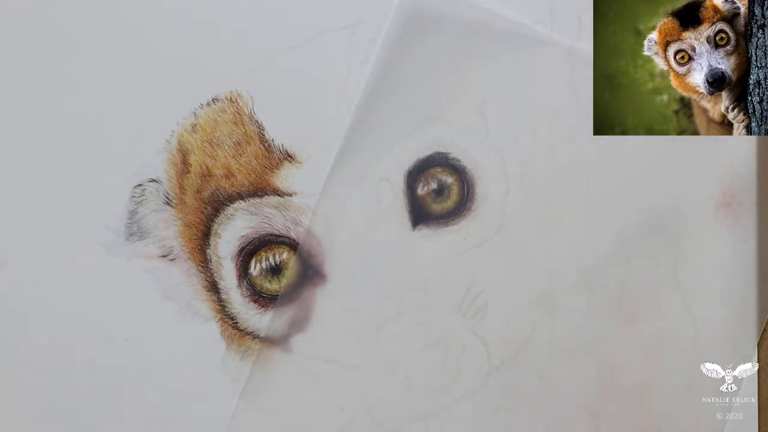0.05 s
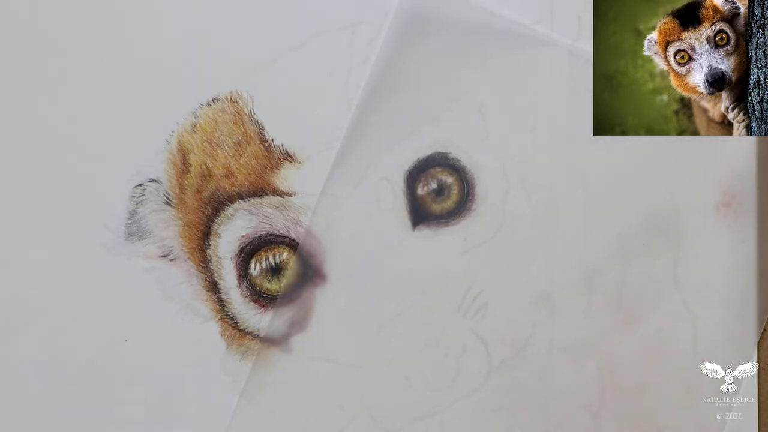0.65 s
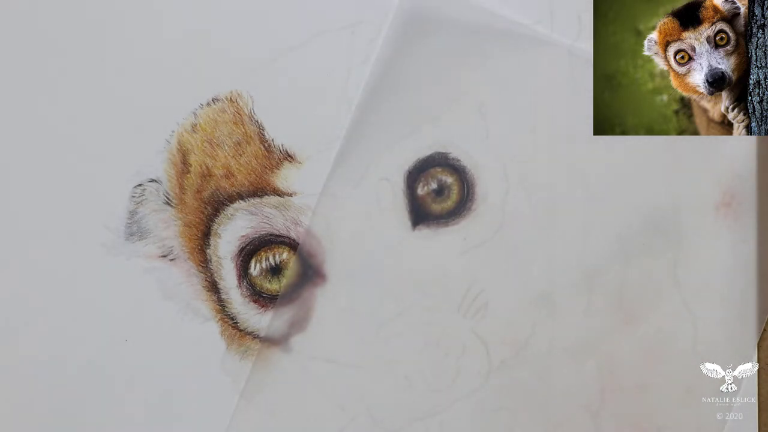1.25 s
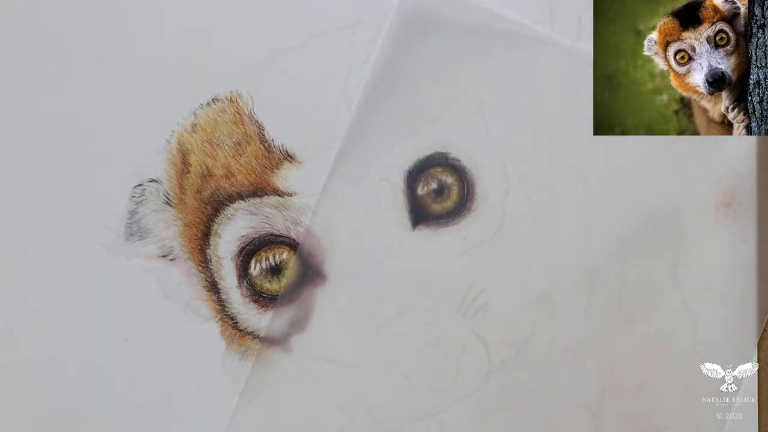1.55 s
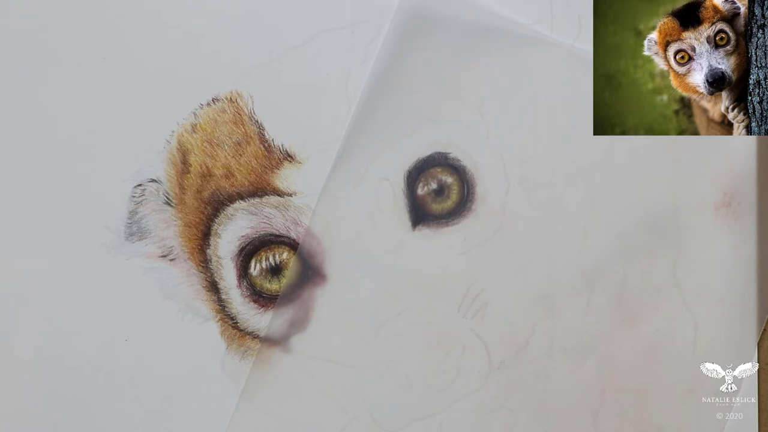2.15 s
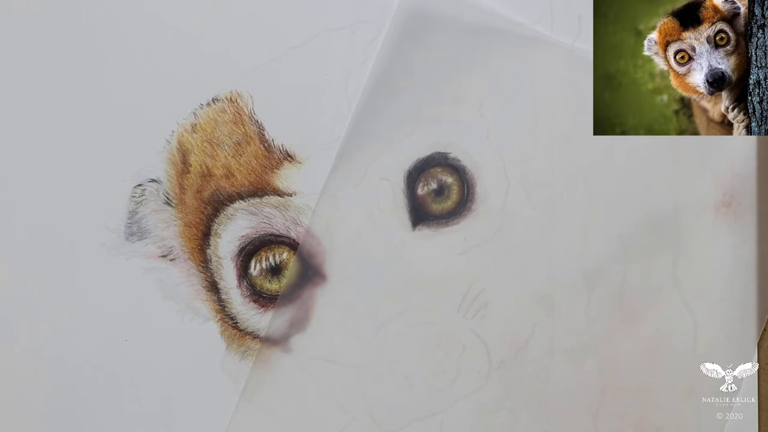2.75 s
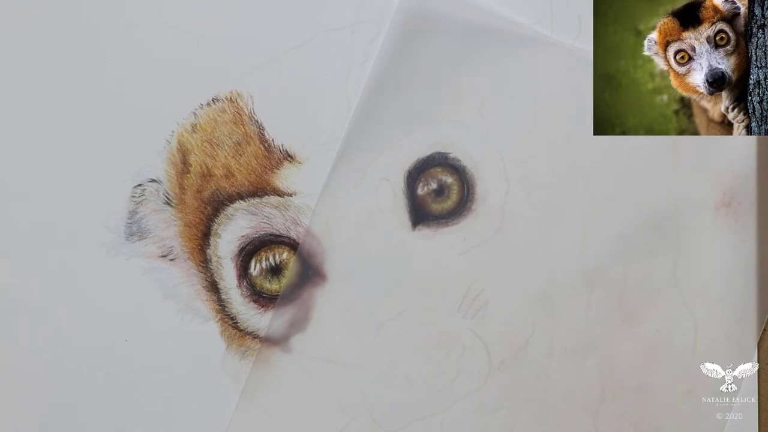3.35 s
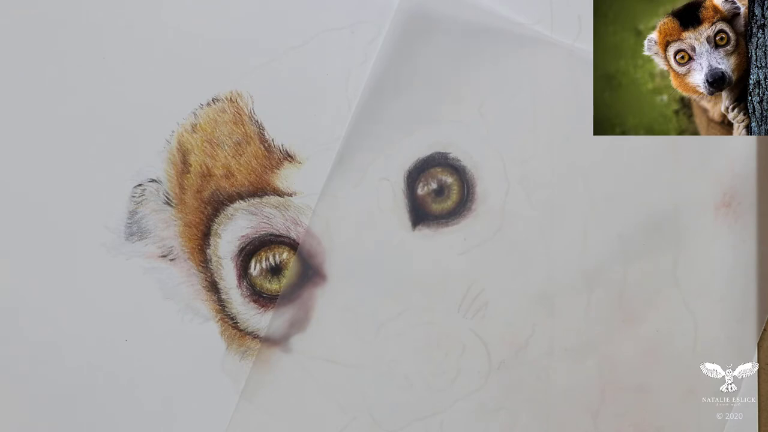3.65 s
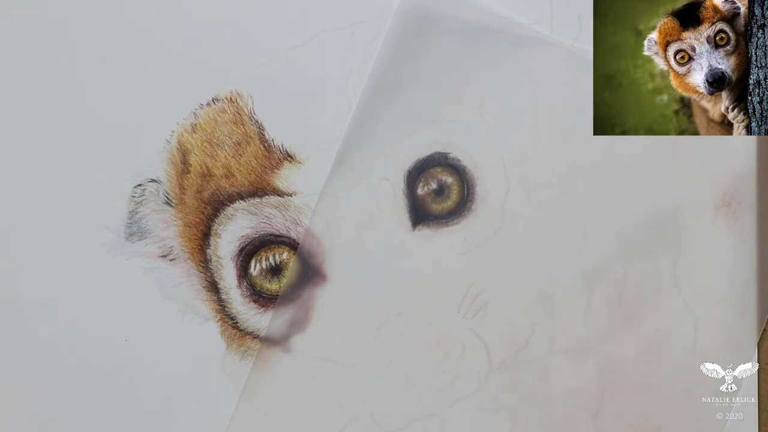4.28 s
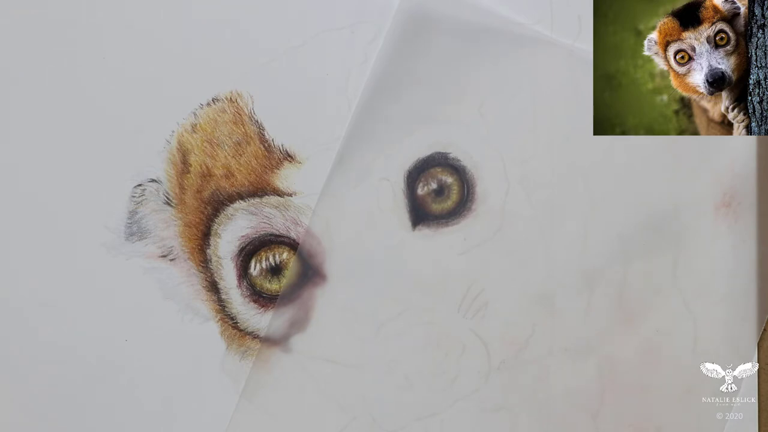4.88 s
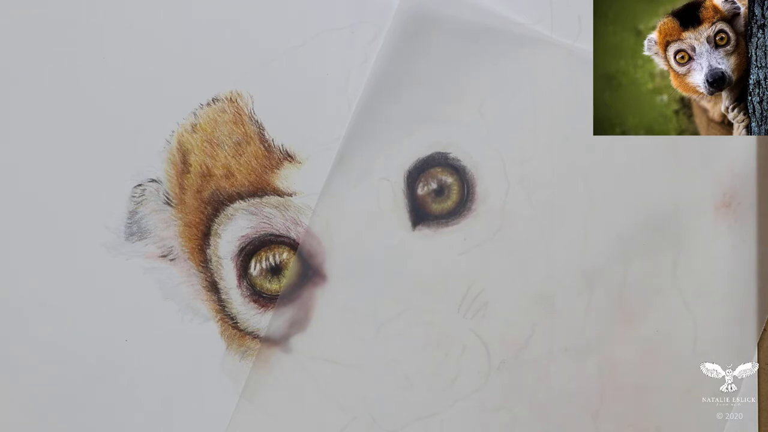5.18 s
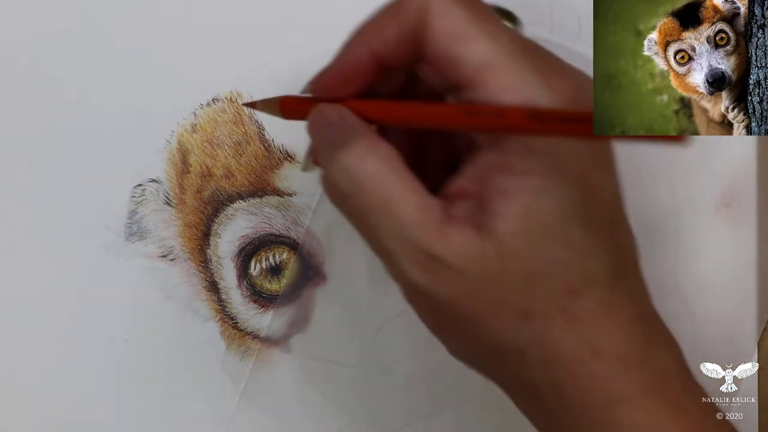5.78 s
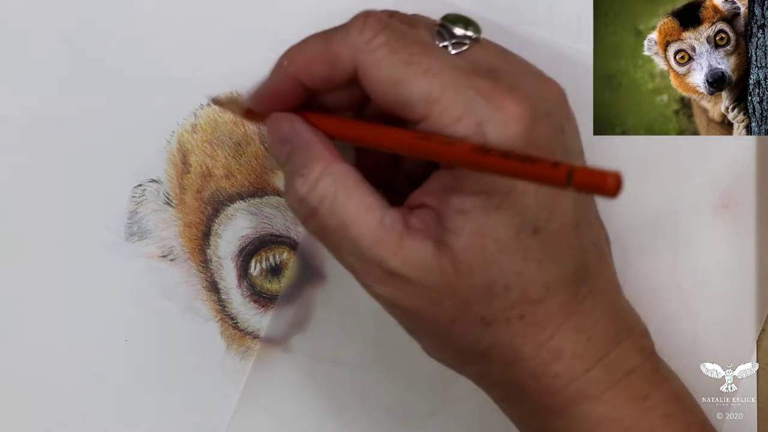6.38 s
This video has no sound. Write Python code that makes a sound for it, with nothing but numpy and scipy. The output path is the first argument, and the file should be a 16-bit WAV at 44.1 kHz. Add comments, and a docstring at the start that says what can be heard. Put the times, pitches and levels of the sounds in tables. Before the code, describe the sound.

A pencil is twisted in a hand sharpener with rasps and brittle snaps, then the sharpener clinks and knocks down onto a desk.

```python
"""A pencil rattles briefly in the mouth of a small hand sharpener, then is twisted: the blade rasps
through the wood and brittle shavings snap off, ringing the shell. The sharpener is put down with a few
knocks that boom in the desk top and two hard clinks of its case, and a hand brushes over paper.
A fan hums faintly behind it all in the quiet room."""
import sys
import numpy as np
from scipy import signal
from scipy.fft import rfft, irfft, next_fast_len
from scipy.io import wavfile

SR = 44100
rng = np.random.default_rng(int(sys.argv[2]) if len(sys.argv) > 2 else 0)


def log_audio(samples):
    """Write samples as a 16-bit WAV file to the path given in sys.argv[1]."""
    # one column per channel
    frames = np.atleast_2d(samples).T
    # limit to full scale, then quantise
    limited = np.clip(frames, -1, 1)
    pcm = np.round(limited * 32767).astype(np.int16)
    wavfile.write(sys.argv[1], SR, pcm)


N = 287793
TIME = np.arange(N) / SR
SIDES = np.array([[.5], [-.5]])  # splits a pan (left minus right) between the two channels

# bites of the blade: t/s, length/s, level/dB, keenness (treble against the rest)/dB
BLADE_BITES = [(1.206, 0.0077, -48, -6.5), (1.408, 0.0046, -56, -8), (1.47, 0.0092, -58, 11.5),
               (1.804, 0.04, -37.5, -0.5), (1.878, 0.022, -41, -1), (2.21, 0.0043, -39, 1),
               (2.233, 0.0061, -37, 2), (2.582, 0.017, -50, -6), (2.623, 0.012, -42, -2),
               (2.66, 0.008, -67, -4), (2.68, 0.006, -38, -5.5), (2.717, 0.028, -48, -4.5),
               (3.017, 0.064, -39.5, -6), (3.118, 0.13, -47.5, -0.5), (3.148, 0.0042, -47.5, 2),
               (3.278, 0.045, -47.5, -8.5), (3.414, 0.057, -57, -14)]
# tone of wood scraping on the blade: f/Hz, level/dB
RASP_SPECTRUM = [(300, -32), (700, -19), (1300, -13), (1750, -4), (2150, -1.5), (2600, -4), (2950, -1),
                 (3750, -2), (4300, -17), (5000, -20), (5600, -13), (8300, -13), (10500, -18.5),
                 (15500, -20), (16000, -27)]
# resonances of the peeling wood: f/Hz, width/Hz, level/dB
PEEL_RESONANCES = [(1740, 70, -3.5), (2130, 80, -3), (2380, 80, -7)]


def blade():
    """The blade rasps through the wood, catching unevenly on the grain; the last twists rub dully."""
    slopes_db_per_s = 611, 61, 605  # digs in, eases as the wood peels, lets go
    keen_hz = 2290  # a keen cut differs from a dull rub above this
    bite = strokes([(s, length, db) for s, length, db, _ in BLADE_BITES], *slopes_db_per_s)
    cut = strokes([(s, length, db + keen) for s, length, db, keen in BLADE_BITES], *slopes_db_per_s)
    grain = rub(amp(2.1 * drift(90)), RASP_SPECTRUM, grain_db=2, slips_per_s=5500)
    peel = sum(amp(db) * resonate(grain, hz * (1 + .035 * drift(7)), width)  # wanders with the turning
               for hz, width, db in PEEL_RESONANCES)
    grain = unit(shaped(grain + peel, barrel))
    dull = shaped(grain, lambda hz: 1 / (1 + (hz / keen_hz) ** 20))
    rasp = bite * dull + cut * (grain - dull) + squeaks()
    return room(rasp, wet_db=-7, echo_db=-33, pan_db=9, lag_s=.00005)


# wood squeaking against the cone: t/s, length/s, level/dB, start f/Hz, end f/Hz
WOOD_SQUEAKS = [(3.258, 0.064, -52.5, 2300, 2450), (3.264, 0.084, -56, 1860, 1690)]


def squeaks():
    """Sticking wood squeaks in short, rough glides."""
    out = np.zeros(N)
    for s, length, db, start_hz, end_hz in WOOD_SQUEAKS:
        progress = np.linspace(0, 1, round(length * SR))
        glide_hz = start_hz + (end_hz - start_hz) * progress
        tone = resonate(rng.standard_normal(len(progress)), glide_hz, width_hz=25)
        add(out, s, amp(db) * np.sin(np.pi * progress) ** 2 * unit(tone))
    return out


# peaks and notches of the sharpener's barrel: f/Hz, width/Hz, lift/dB
BARREL_RESONANCES = [(2680, 140, -5), (2940, 150, 9.5), (3200, 130, -10), (3550, 250, 0), (5080, 300, -7),
                     (5650, 400, 4), (6800, 600, -7), (7650, 350, 3), (8350, 350, 3), (8950, 450, -8),
                     (9650, 450, 5), (10350, 500, -8), (11400, 550, 5), (12250, 450, -5), (13100, 500, 4),
                     (14000, 500, -4)]


def barrel(hz):
    """Gain of the hollow barrel, which colours the rasp and the snaps."""
    return amp(sum(db / (1 + (2 * (hz - centre) / width) ** 2)
                   for centre, width, db in BARREL_RESONANCES))


# shavings breaking off: t/s, level/dB, brightness/(dB per octave), shell ring against the snap/dB
SHAVING_SNAPS = [(1.1079, -33, -8.5, -1), (1.218, -29, -10, -12), (1.4125, -34, -10.5, -14),
                 (1.476, -3.5, 0.5, -24.5), (1.7924, -3, 2, -16), (1.8273, -6, -5, -19.5),
                 (1.8445, 1.5, -0.5, -25), (1.877, -16, 0, -19.5), (2.2102, -8.5, -4.5, -21),
                 (2.2406, -15.5, -4, -15), (2.6766, -20, -1, -15), (3.0184, -22.5, -6.5, -24),
                 (3.0529, 0, -0.5, -22.5), (3.1249, -4.5, -1.5, -20), (3.2084, -9, -3, -15.5)]
# tone of a snap: f/Hz, level/dB
SNAP_SPECTRUM = [(40, -72), (300, -46.5), (1000, -22), (1800, -13), (2400, -5.5), (3000, -8.5),
                 (4600, -10.5), (6000, -3.5), (7800, 3.5), (9600, 8), (13000, 6.5), (15500, -9),
                 (16000, -12)]
# ring of the sharpener's shell: f/Hz, level/dB, t60/s
SHELL_MODES = [(2950, -1, 0.014), (3000, -21, 0.13), (5100, -9, .012), (7700, -6, 0.014), (9700, -12, 0.01)]


def shavings():
    """Brittle shavings snap, each with a colour of its own, and ring the sharpener's shell."""
    snaps = np.zeros((2, N))
    for s, db, tilt_db, ring_db in SHAVING_SNAPS:
        colour = [(hz, level + 3 * rng.uniform(-.88, 1)) for hz, level in SNAP_SPECTRUM]
        pitch = 1 + .02 * rng.uniform(-.68, 1)
        shell = ring([(pitch * hz, level, t60) for hz, level, t60 in SHELL_MODES])
        snap = tear(crumble(click(colour, tilt_db), spread_s=.00036))
        add(snaps, s, amp(db) * (snap + amp(ring_db) * shell))
    snaps = shaped(snaps, lambda hz: barrel(hz) ** .7)
    return room(snaps, wet_db=-11.5, echo_db=-30, pan_db=0, lag_s=.00004)


def tear(snap, level_db=-7, decay_s=.0028):
    """Fibres tear just after a snap: a few milliseconds of dying crackle."""
    fibres = rng.standard_normal(1024) * np.exp(-TIME[:1024] / decay_s)
    fibres *= amp(level_db) / np.linalg.norm(fibres)
    return snap + signal.fftconvolve(snap, fibres[None], axes=1)[:, :snap.shape[1]]


# the case meeting the desk: t/s, tick/dB, clang/dB, clang f/Hz, clang t60/s, ping/dB, pan/dB, reverb/dB
CASE_CLINKS = [(4.1979, -7.5, -4, 3895, .007, -11.5, -4, -9.5),
               (4.291, -41, -44, 3830, .01, -51, -0.5, 1.5), (4.4289, 2, -1.5, 3756, 0.0086, -4, -3, -6),
               (4.4361, -13, -10, 3800, .008, -30, -1, -9)]
# tone of the tick: f/Hz, level/dB
TICK_SPECTRUM = [(40, -44), (250, -38.5), (700, -23), (1100, -6), (2000, -7), (3000, 4), (4800, -4),
                 (5300, -10.5), (6000, -6), (6850, -30.5), (7500, -6.5), (9500, -11.5), (11500, -9),
                 (13000, -32.5), (16000, -37)]
# the case's ping after a clang at CASE_HZ: f/Hz, level/dB, t60/s
CASE_MODES = [(2890, -17, .09), (3375, -16, .085), (3700, -9, .11), (3770, 0, .15), (3822, -5, .14)]
CASE_HZ = 3800


def case():
    """The hard case clinks: a tick, a bright clang damped by the grip, and a pure ping that rings on."""
    out = np.zeros((2, N))
    clang_rise = 1 - np.exp(-(TIME[:8192] / .00079) ** 2)
    ping_rise = 1 - np.exp(-TIME[:8192] / .005)  # builds as the clang dies
    shade_db = -3.5  # the hand keeps some of the tone from the room
    for s, tick_db, clang_db, hz, t60, ping_db, pan_db, wet_db in CASE_CLINKS:
        clang = clang_rise * ring([(hz, 0, t60)])
        ping = ping_rise * ring([(f * hz / CASE_HZ, db, ring_s) for f, db, ring_s in CASE_MODES])
        tick, tone = np.zeros((2, 2, N))
        add(tick, s, amp(tick_db) * crumble(click(TICK_SPECTRUM), spread_s=.00067))
        add(tone, s, amp(clang_db) * clang / abs(clang).max() + amp(ping_db) * ping)
        out += room(tick, wet_db=wet_db, echo_db=-11, pan_db=pan_db, lag_s=.00009)
        out += room(tone, wet_db=wet_db + shade_db, echo_db=-12, pan_db=pan_db, lag_s=.00007)
    return out


# blows on the desk: t/s, boom/dB, crack/dB, brightness/(dB per octave), swell/s, low cut/Hz
DESK_KNOCKS = [(1.413, -44, -44, 3, 0.0029, 480), (4.107, -41.5, -52, -3, 0.0103, 290),
               (4.1398, -19.5, -49, -11, 0.008, 226), (4.257, -38, -54.5, -9.5, 0.0016, 300),
               (4.276, -43.5, -35.5, -3.5, 0.0023, 480), (4.289, -36, -32.5, -7, 0.00088, 146),
               (4.473, -28.5, -29.5, -5.5, 0.0035, 450), (4.5827, -21, -12.5, -0.5, 0.0052, 310),
               (4.5933, -12.5, 2, 0, 0.04, 20)]
# ring of the desk top: f/Hz, level/dB, t60/s
DESK_MODES = [(130, -20, .12), (252, 2, .17), (302, -14, .12), (351, -3.5, .16), (421, -5.5, .18),
              (447, -9, .12), (591, -7, .13), (652, -10, .13), (721, -11, .13), (829, -13, .13),
              (924, -6, .115), (1088, -12, .11), (1190, -13, .12), (1417, -14, .11), (1562, -11, .125),
              (1820, -19, .13)]
# tone of the contact crack: f/Hz, level/dB
CRACK_SPECTRUM = [(100, -15.5), (400, -4.5), (750, -16.5), (950, 2), (1250, -1.5), (1550, 3.5), (2100, -11),
                  (3300, -7.5), (4500, -37), (8000, -27), (12000, -42.5), (16000, -48.5)]
# tone of the thud under it: f/Hz, level/dB
THUD_SPECTRUM = [(40, -9.5), (160, -21), (250, -3), (400, -0.5), (520, -3.5), (620, -0.5), (900, -12),
                 (1500, -20.5), (4000, -29.5), (12000, -60.5)]


def desk():
    """Each blow cracks at the contact, thuds and sets the desk top booming; light ones lack bass."""
    cracks, (booms, thuds) = np.zeros((2, N)), np.zeros((2, N))
    for s, boom_db, crack_db, tilt_db, swell_s, low_cut_hz in DESK_KNOCKS:
        thin_db = lambda hz: -10 * np.log10(1 + (low_cut_hz / hz) ** 6)
        top = ring([(hz, db + thin_db(hz) + tilt_db * np.log2(1 + hz / 500), t60)
                    for hz, db, t60 in DESK_MODES])  # soft blows miss the high modes
        top *= 1 - np.exp(-TIME[:len(top)] / max(swell_s, .001))
        thud = click([(hz, db + thin_db(hz)) for hz, db in THUD_SPECTRUM], .93 * tilt_db)
        add(booms, s, amp(boom_db) * top / abs(top).max())
        add(cracks, s, amp(crack_db) * crumble(click(CRACK_SPECTRUM, tilt_db), spread_s=.0003))
        add(thuds, s, amp(boom_db) * thud)
    thuds = room(thuds, wet_db=12.5, echo_db=5.5, pan_db=1.5, lag_s=.00008)
    cracks = room(cracks, wet_db=-5.5, echo_db=-7, pan_db=-10, lag_s=.0001)
    return booms * pan(2.5) + .25 * thuds + cracks


# taps of the loose pencil: t/s, level/dB, f/Hz, length/s
PENCIL_TAPS = [(.6527, -21, 2030, .0065), (.6603, -21, 2060, .0065), (.6635, -36, 1080, .008),
               (.6672, -29, 960, .0095), (.6865, -38, 1050, .008)]
# ring of the room near 1 kHz after the taps, heard on the left: f/Hz, level/dB, t60/s
ROOM_RING_MODES = [(908, -2, 0.26), (1093, 7, 0.087)]


def rattle():
    """The pencil knocks about in the mouth: round taps with a dry tick, and a ring off to the left."""
    taps, hollow = np.zeros((2, N))
    for s, db, hz, length in PENCIL_TAPS:
        t = np.arange(0, length, 1 / SR)
        swell = np.sin(np.pi * t / length) ** 6
        tick = amp(-22.5) * rng.standard_normal(len(t))
        add(taps, s, amp(db) * swell * (np.sin(2 * np.pi * hz * t) + tick))
        add(hollow, s + length / 2, amp(db - 23.5) * ring(ROOM_RING_MODES))
    taps = shaped(taps, lambda hz: 1 / np.sqrt(1 + (hz / 3500) ** 4))
    return room(taps, wet_db=-15, echo_db=-17, pan_db=4, lag_s=.00009) + hollow * pan(29.6)


# high swishes: t/s, length/s, level/dB, high cut/Hz
# at 4.412 s a brief hiss swells into the loud clink; the last two are the hand on the paper
SWISHES = [(3.424, 0.0042, -67, 11930), (4.153, 0.04, -60, 11000), (4.31, 0.059, -66, 11130),
           (4.412, .012, -55, 11000), (5.294, 0.02, -68.5, 16000), (5.445, 0.022, -73.5, 16060)]
# tone of the swish: f/Hz, level/dB
SWISH_SPECTRUM = [(2000, -18), (5000, -10), (8000, -6.5), (14000, -3.5), (16000, -14.5)]
# dull rustles: t/s, length/s, level/dB
# at 4.576 s a short swell of noise leads into the loudest knocks; the others are hands shifting
RUSTLES = [(.57, 0.11, -57), (1.26, 0.083, -57.5), (1.37, 0.037, -60), (4.576, .01, -39),
           (6.14, 0.11, -61.5)]
# tone of the rustle: f/Hz, level/dB
RUSTLE_SPECTRUM = [(100, -9.5), (250, -2.5), (420, -0.5), (900, -6), (1400, -12), (3000, -29),
                   (16000, -59.5)]


def swishes_and_rustles():
    """Short swells of grainy noise: soft, high swishes, and dull rustles off to the left."""
    slopes_db_per_s = 521.5, 28, 349  # rise, sag, fall
    hiss = rub(1, SWISH_SPECTRUM, grain_db=3, slips_per_s=1500)
    swish = np.zeros(N)
    for s, length, db, top_hz in SWISHES:
        swell = hiss * strokes([(s, length, db)], *slopes_db_per_s)
        swish += shaped(swell, lambda hz: 1 / (1 + (hz / top_hz) ** 20))
    rustle = rub(strokes(RUSTLES, *slopes_db_per_s), RUSTLE_SPECTRUM, grain_db=1, slips_per_s=2400)
    return room(swish, wet_db=-5, echo_db=8.5, pan_db=-4.5, lag_s=.00005) + rustle * pan(9.4)


# tone of the fan's air: f/Hz, level/dB
AIR_SPECTRUM = [(15, -30.5), (25, -17.5), (45, 1.5), (75, -11.5), (100, -4.5), (140, -11.5), (220, -5.5),
                (380, -4), (560, -8), (790, -9.5), (1150, -8.5), (1650, -14.5), (2500, -22), (4750, -33.5),
                (8000, -28.5), (11500, -30), (13500, -47), (16000, -70)]
# stereo likeness of the air: f/Hz, left-right correlation
AIR_LIKENESS = [(60, 0.83), (180, 0.52), (550, 0.69), (1650, -0.27), (4970, 0.18), (15000, -0.46)]
# the fan's hum lines: f/Hz, level/dB
HUM_LINES = [(48.4, -72.5), (414.5, -70), (602.9, -67), (845.2, -77.5), (979.8, -74), (1120, -70)]
# where the fan sits: f/Hz, pan/dB
FAN_PAN = [(60, 1.5), (180, 1.5), (550, 8.5), (1650, 1), (4970, -1.5), (15000, 0.5)]


def fan():
    """The fan lays a bed of rushing air with a few wavering hum lines."""
    left, other = rng.standard_normal((2, N))
    same = lambda hz: read(AIR_LIKENESS, hz)
    right = shaped(left, same) + shaped(other, lambda hz: np.sqrt(1 - same(hz) ** 2))
    air = unit(shaped(np.array([left, right]), lambda hz: amp(read(AIR_SPECTRUM, hz))))
    rush = amp(-56.5 + .8 * drift(5)) * air
    hum = np.zeros(N)
    for hz, db in HUM_LINES:
        waver = amp(2.7 * drift(9.8))
        phase = 2 * np.pi * hz * TIME + 2.1 * drift(10)
        hum += amp(db) * unit(waver * np.sin(phase))
    return shaped(rush + hum, lambda hz: pan(read(FAN_PAN, hz)))


# decay of the room: f/Hz, t60/s
ROOM_DECAY = [(200, 0.28), (800, 0.17), (2000, 0.16), (3800, 0.16), (8000, 0.1541), (15000, 0.065)]
# lean of the reflections: f/Hz, pan/dB
ROOM_PAN = [(200, 9), (500, 13.5), (1100, 20.5), (2500, 10.5), (3900, -1), (6000, 5.5), (10000, 3.5)]
# slaps off near surfaces: delay/s, level/dB
NEAR_ECHOES = [(.0075, -7), (0.0133, -19), (0.0221, -16.5), (.0335, -15)]


def room(x, wet_db, echo_db, pan_db, lag_s, size=16384):
    """Direct sound arrives on the right first; near echoes and a short tail lean to the left."""
    taps = rng.choice([-1., 1.], (2, size)) * (rng.random((2, size)) < .2)
    hz, t, bands = signal.stft(taps, SR, nperseg=256)
    same = np.exp(-(hz / 900) ** 2)[:, None]  # long waves reach both sides alike
    bands[1] = same * bands[0] + np.sqrt(1 - same ** 2) * bands[1]
    fade_db = -60 * (t / read(ROOM_DECAY, hz)[:, None]) ** 1.127  # holds briefly, then falls away
    tail = signal.istft(bands * amp(fade_db), SR, nperseg=256)[1]
    tail *= 1 - np.exp(-TIME[:tail.shape[1]] / .00011)
    tail *= amp(wet_db) / np.linalg.norm(tail[0])
    for delay, db in NEAR_ECHOES:
        tail[:, round(delay * SR)] += amp(db + echo_db)
    wet = signal.oaconvolve(np.atleast_2d(x), tail, axes=1)[:, :N]
    direct = shaped(x, lambda f: pan(pan_db) * np.exp(-2j * np.pi * f * SIDES * lag_s))
    return direct + shaped(wet, lambda f: pan(read(ROOM_PAN, f)))


def rub(pressure, spectrum, grain_db, slips_per_s):
    """Friction: a dense train of tiny slips of uneven size, as loud as the pressure."""
    slips = rng.choice([-1., 1.], N) * (rng.random(N) < slips_per_s / SR)
    slips *= amp(grain_db * np.minimum(rng.exponential(1, N), 4))
    return pressure * unit(shaped(slips, lambda hz: amp(read(spectrum, hz))))


def strokes(rows, rise, sag, fall):
    """Envelope of short strokes: each swells in, sags and dies away, at slopes in dB/s."""
    gain = np.zeros(N)
    for s, length, db in rows:
        t = TIME - s
        drop_db = rise * np.maximum(-t, 0) + sag * np.clip(t, 0, length) + fall * np.maximum(t - length, 0)
        gain += amp(db - drop_db)
    return gain


def click(spectrum, tilt_db=0, size=8192):
    """The shortest causal pulse with this spectrum, tilted per octave; peak 1."""
    hz = abs(np.fft.fftfreq(size, 1 / SR))
    log_gain = np.log(amp(read(spectrum, hz) + tilt_db * np.log2(1 + hz / 500)))
    pulse = np.fft.ifft(np.exp(np.conj(signal.hilbert(log_gain)))).real
    return pulse / abs(pulse).max()


def crumble(pulse, spread_s):
    """Spreads a pulse into a quick, ragged burst of the same colour, a little different on each side."""
    age = TIME[:1024] / spread_s
    burst = (rng.standard_normal(1024) + .4 * rng.standard_normal((2, 1024))) * age * np.exp(-age)
    white = np.fft.fftshift(irfft(np.exp(1j * np.angle(rfft(burst)))), axes=1)
    return signal.fftconvolve(pulse[None], white[:, white.shape[1] // 2 - 12:], axes=1)[:, :len(pulse)]


def ring(modes, size=8192):
    """Dying sines of a struck body; peak 1."""
    t = TIME[:size]
    out = sum(amp(db - 60 * t / t60) * np.sin(2 * np.pi * hz * t) for hz, db, t60 in modes)
    return out / abs(out).max()


def resonate(x, hz, width_hz):
    """A resonance of gain 1 that follows the curve hz."""
    turn = np.exp(2j * np.pi * np.cumsum(hz) / SR)
    pole = np.exp(-np.pi * width_hz / SR)
    return 2 * (turn * signal.lfilter([1 - pole], [1, -pole], x / turn)).real


def drift(rate_hz):
    """Slow random wobble of rms 1."""
    return unit(shaped(rng.standard_normal(N), lambda hz: np.exp(-hz / rate_hz)))


def shaped(x, gain):
    """Filters by a gain given as a function of frequency."""
    size = next_fast_len(x.shape[-1] + 4096)
    return irfft(rfft(x, size) * gain(np.fft.rfftfreq(size, 1 / SR)), size)[..., :x.shape[-1]]


def read(points, hz):
    """Reads a table on a log-frequency axis."""
    f, value = np.transpose(points)
    return np.interp(np.log(hz + 1), np.log(f + 1), value)


def add(mix, s, sound):
    """Mixes a sound in at time s."""
    part = mix[..., round(s * SR):][..., :sound.shape[-1]]
    part += sound[..., :part.shape[-1]]


def amp(db):
    """Decibels to gain."""
    return 10 ** (np.asarray(db) / 20)


def pan(db):
    """Channel gains with the left louder by db."""
    return amp(SIDES * db)


def unit(x):
    """Scales to rms 1."""
    return x / np.sqrt(np.mean(x ** 2) + 1e-20)


def scene():
    """The full mix."""
    return blade() + shavings() + rattle() + case() + desk() + swishes_and_rustles() + fan()


def record(dry):
    """The loudest blows overload and clip; then a steep high cut."""
    high_cut = signal.firwin(511, cutoff=16200, window=("kaiser", 9), fs=SR)
    return signal.oaconvolve(np.clip(dry, -1, 1), high_cut[None], "same")


dry = scene()
out = record(dry)
log_audio(out)
```